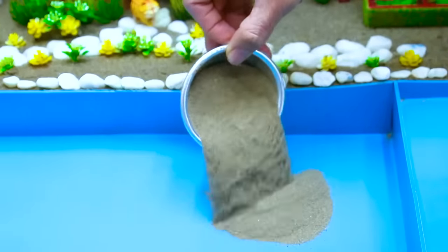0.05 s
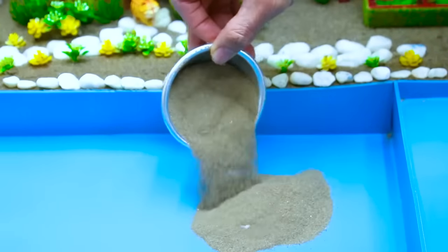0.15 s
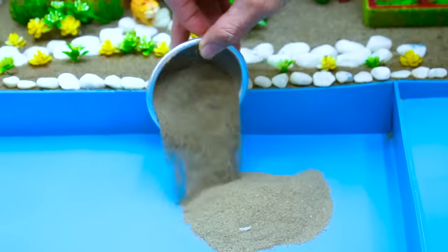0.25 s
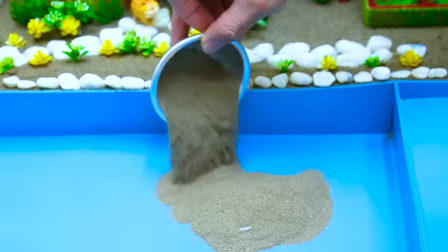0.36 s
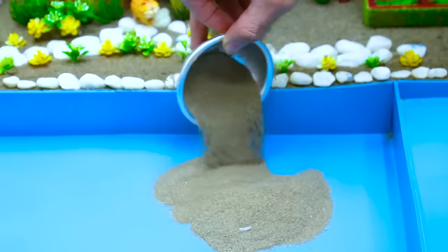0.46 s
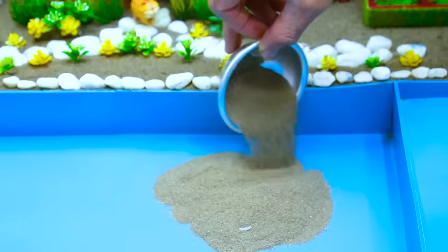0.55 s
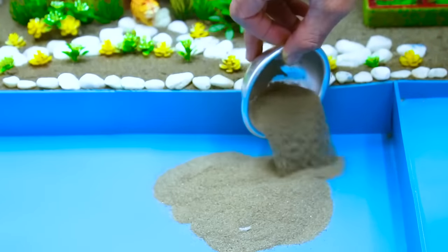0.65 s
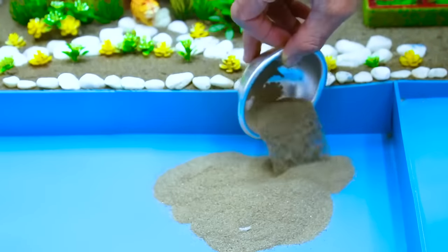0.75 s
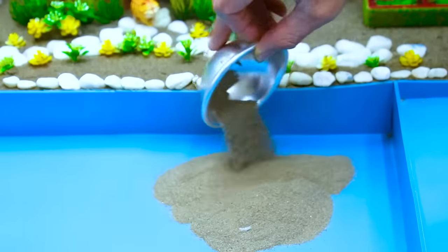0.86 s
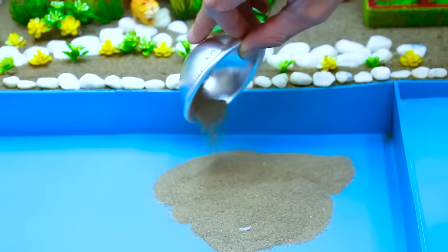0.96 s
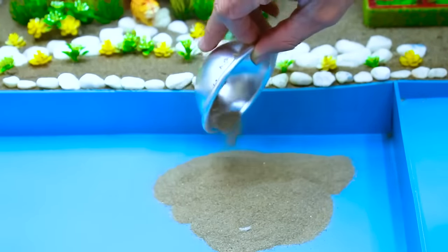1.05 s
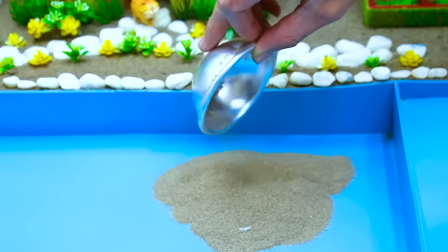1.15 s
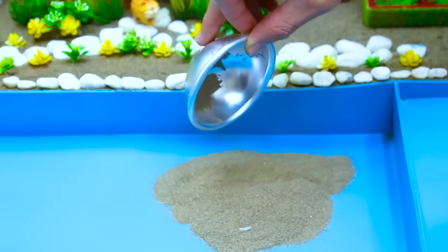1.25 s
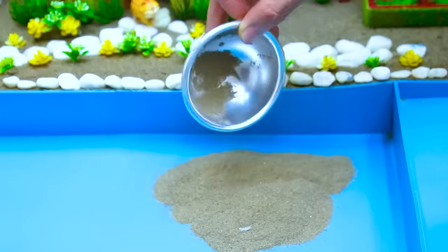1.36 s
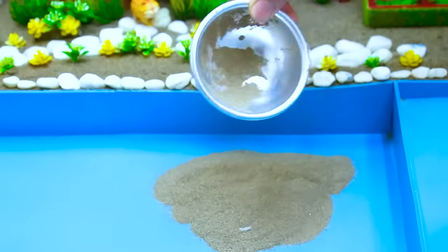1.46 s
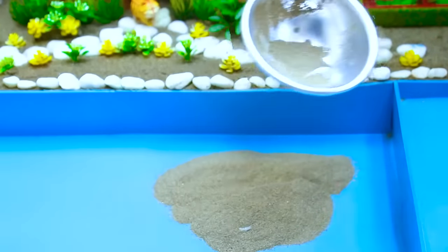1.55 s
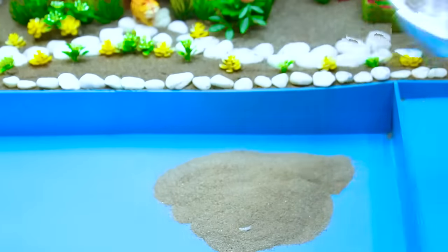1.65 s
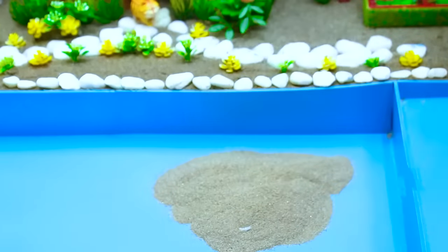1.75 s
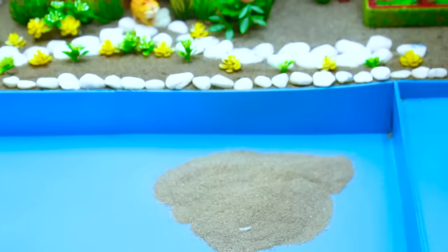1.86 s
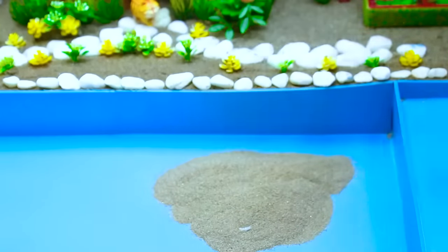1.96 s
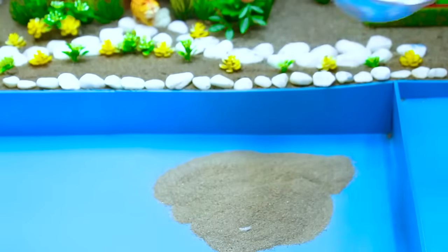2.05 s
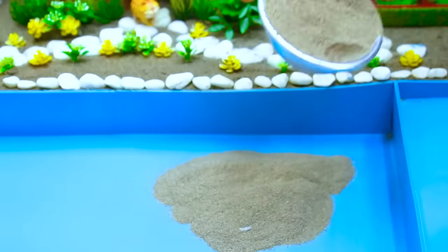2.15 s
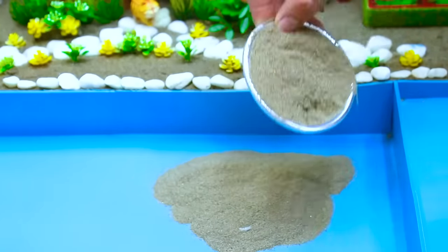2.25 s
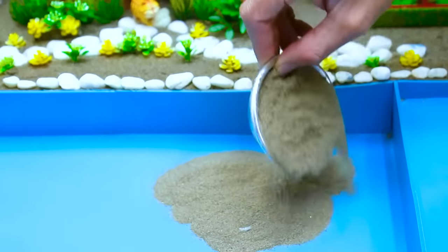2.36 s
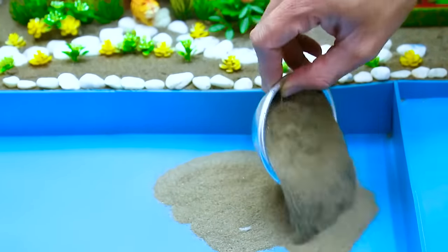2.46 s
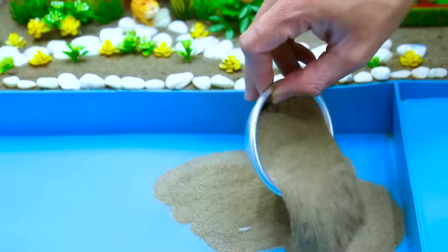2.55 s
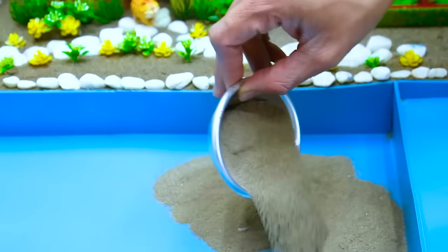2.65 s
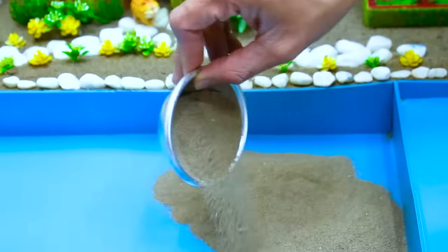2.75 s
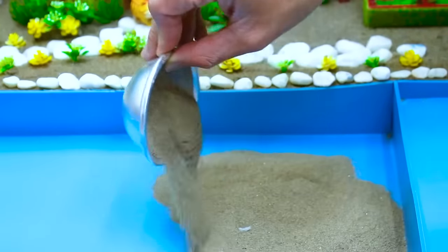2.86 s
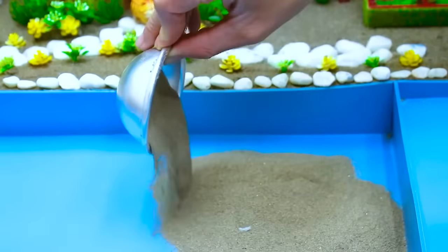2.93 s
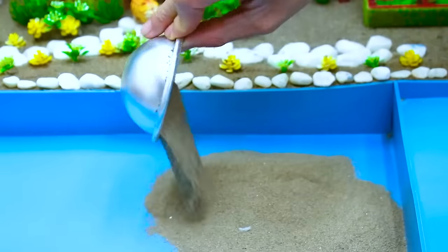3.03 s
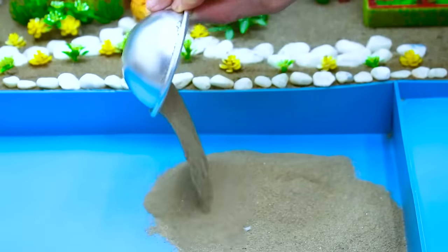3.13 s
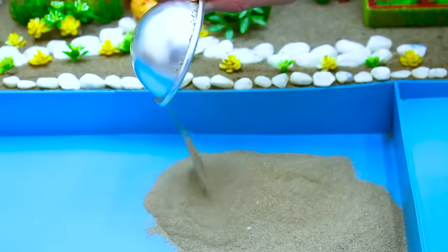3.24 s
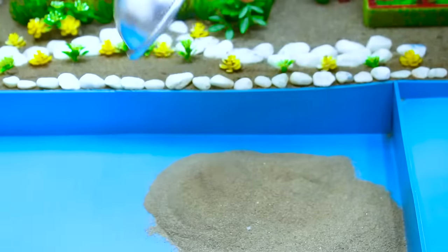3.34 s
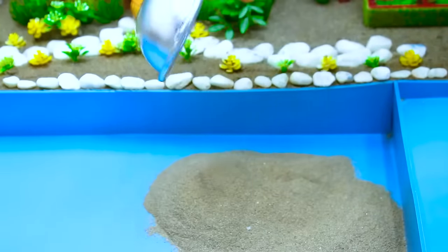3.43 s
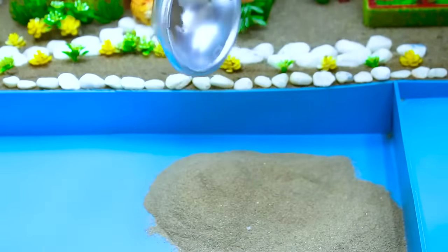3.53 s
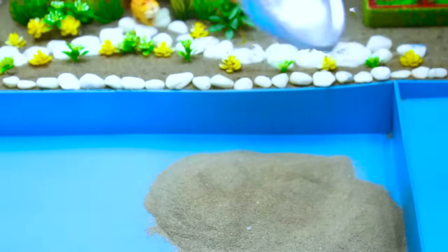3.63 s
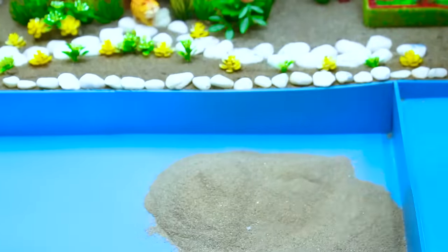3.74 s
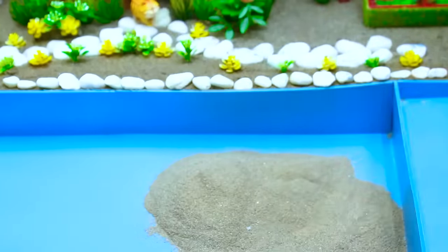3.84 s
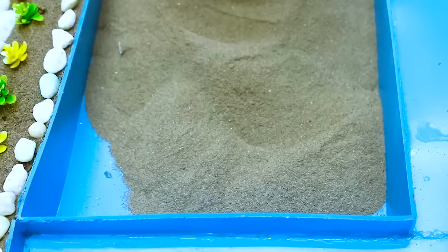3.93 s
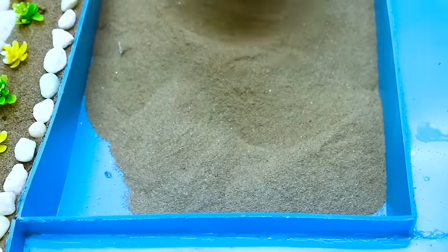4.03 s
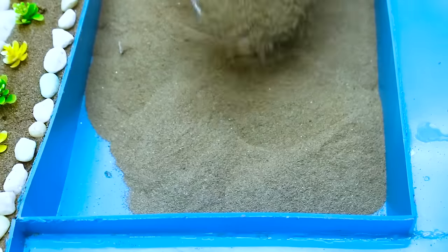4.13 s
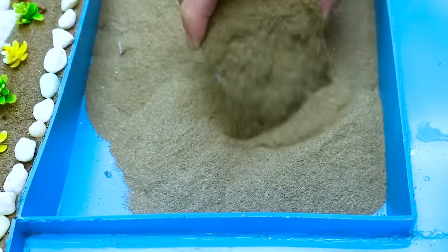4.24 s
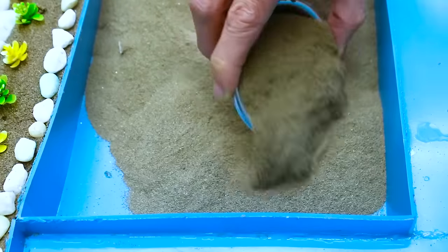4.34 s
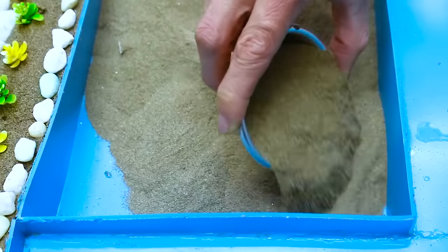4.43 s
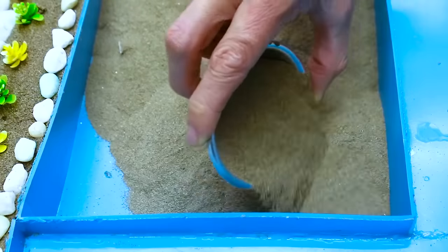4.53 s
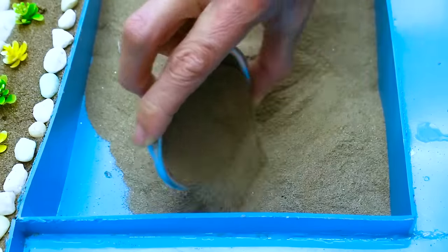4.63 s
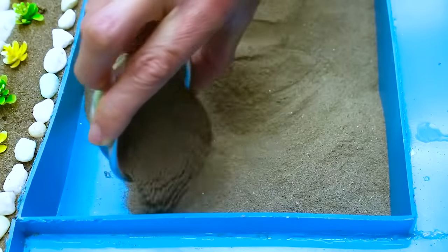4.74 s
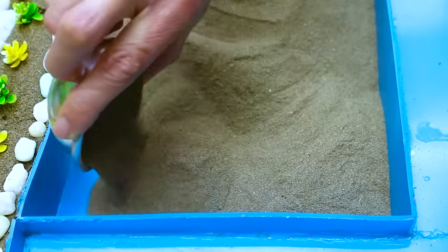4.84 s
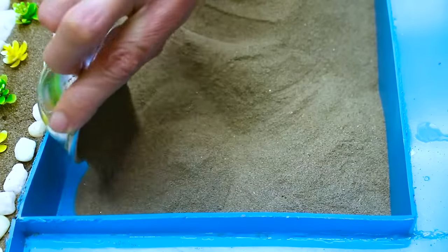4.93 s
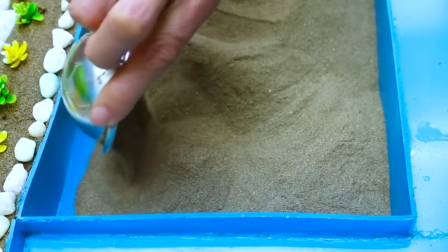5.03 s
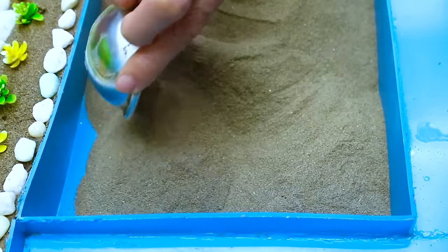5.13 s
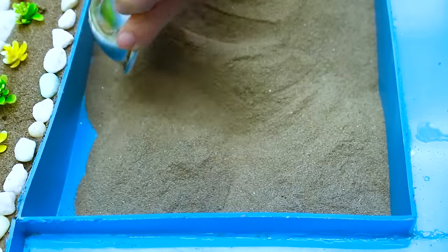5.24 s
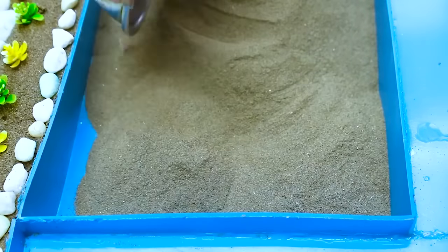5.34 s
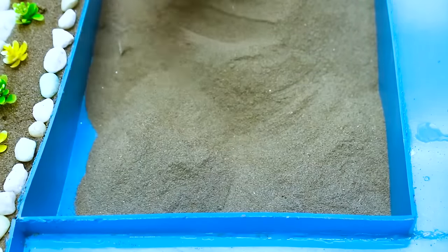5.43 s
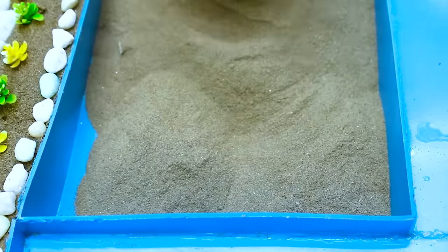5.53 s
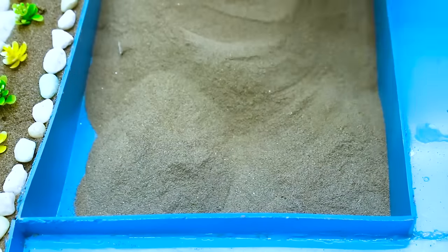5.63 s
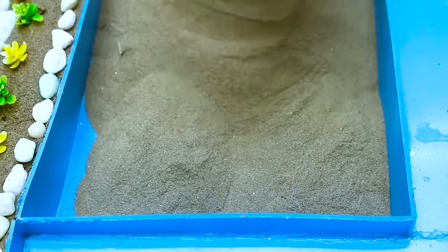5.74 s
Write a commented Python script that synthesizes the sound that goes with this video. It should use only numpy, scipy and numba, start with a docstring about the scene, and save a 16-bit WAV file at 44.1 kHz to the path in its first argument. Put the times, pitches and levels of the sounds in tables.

```python
"""A garden, the microphone close to a plastic tray, a soft rumble far off and birds among echoing trees.
The same pour of dry sand sounds three times. First coarse grains ring and fine sand patters under chirps.
Near 2.5 s grains tick and the pour comes again, brisker and higher, while a nearer bird trills twice.
That bird whistles three times, and from 4.2 s the pour ticks, rushes and trickles away once more.
Small birds and a distant flock have the last notes."""
import sys
import numpy as np
from scipy import signal
from scipy.fft import rfft, irfft, next_fast_len
from scipy.io import wavfile
from scipy.ndimage import uniform_filter1d
from numba import njit

SR = 44100
rng = np.random.default_rng(int(sys.argv[2]) if len(sys.argv) > 2 else 0)


def output_pcm(signal):
    """Save a mono or channel-first signal as 16-bit PCM at the path in sys.argv[1].

    Samples are clipped to [-1, 1] before scaling.
    """
    pcm = np.clip(np.atleast_2d(signal).T, -1, 1) * 32767
    wavfile.write(sys.argv[1], SR, np.round(pcm).astype(np.int16))


N = 255339

# Distant rumble and hiss. Each row: frequency in Hz, relative level in dB.
AIR_SPECTRUM = [(18, -50), (30, -23), (86, -33.5), (215, -5), (345, 0.5), (702, -5.5), (1390, -10),
                (1960, -9.5), (3980, -10), (12600, -21.5), (14400, -35), (16000, -72.5)]
# Echo of a high song, hanging in the trees. Each row: time in seconds, level in dB.
SONG_ECHO = [(0, -50), (.3, -47), (.55, -44.5), (.75, -54), (.95, -70)]
# The flock, far off. Each row: time in seconds, level in dB.
FLOCK_LEVEL = [(0.0, -47), (0.44, -50), (1.63, -58.5), (2.3, -104), (2.801, -100), (3.14, -62),
               (3.369, -61), (3.5, -70), (3.89, -53.5), (4.24, -63), (4.5, -65), (4.641, -45.5),
               (4.95, -67), (5.29, -54), (5.63, -42), (5.79, -76)]
# How much of the flock echoes from the sides. Each row: time in seconds, share from 0 to 1.
FLOCK_SIDE_SHARE = [(0.551, 0.08), (.75, 0.8), (1.6, 0.5), (1.8, 0)]
# Small birds, farther out. Each row: start, time to the bend and length in seconds,
# first, bend and last pitch in Hz, level at the bend in dB, rasp in Hz.
CHIRPS = [(0.118, 0.021, 0.098, 2034, 2510, 2730, -35.5, 103),
          (0.254, 0.011, 0.047, 2630, 2500, 1963, -35, 34),
          (0.299, .055, 0.071, 1987, 1896, 1820, -42.5, 30),
          (.282, 0.047, .087, 2900, 3294, 3790, -43.5, 270),
          (0.482, 0.057, 0.11, 3685, 4570, 2997, -37.5, 225),
          (0.529, 0.0075, 0.023, 4260, 4900, 5550, -42, 170),
          (0.573, .014, .075, 3710, 4070, 4060, -44.5, 54),
          (0.707, .01, 0.028, 3970, 3590, 3240, -41.5, 230),
          (0.864, .02, 0.034, 3740, 3430, 3120, -45.5, 230),
          (1.247, 0.018, 0.052, 4740, 5200, 5110, -48.5, 170),
          (1.312, .03, 0.034, 3803, 4580, 4630, -51, 120),
          (1.277, 0.047, .12, 4680, 3700, 2950, -49.5, 320), (1.42, .03, 0.087, 2184, 2100, 2035, -56, 120),
          (1.492, 0.011, 0.023, 6180, 6630, 7050, -49.5, 81),
          (1.547, .008, 0.041, 5270, 5150, 4980, -43, 16), (1.808, 0.011, 0.057, 6350, 6310, 6620, -43, 54),
          (1.848, .075, 0.087, 6810, 6730, 6790, -38, 35), (1.826, 0.03, 0.07, 3430, 3380, 3330, -52, 146),
          (1.962, 0.038, 0.066, 3870, 3950, 3890, -45.5, 11),
          (2.154, .028, 0.028, 3953, 3890, 3980, -51, 9), (2.109, .025, .05, 4400, 3300, 2430, -61, 240),
          (2.289, 0.025, 0.059, 4040, 3330, 2890, -52, 230),
          (2.413, 0.026, 0.068, 3920, 5600, 3840, -47, 190),
          (2.616, 0.051, .07, 5300, 3950, 4100, -46.5, 140),
          (3.645, 0.015, 0.042, 3710, 4900, 4700, -41.5, 100),
          (3.698, .015, .04, 4570, 4980, 4410, -43.5, 290), (3.744, 0.08, 0.13, 4520, 3954, 4000, -40, 147),
          (3.777, .01, .021, 8000, 9000, 10040, -48.5, 220),
          (3.91, .012, .03, 4900, 5700, 5800, -46.5, 220),
          (3.945, 0.0065, 0.016, 7800, 8700, 9600, -46, 210),
          (4.497, .01, 0.019, 4580, 4240, 3700, -40, 230),
          (4.746, 0.037, 0.059, 4490, 4375, 4420, -36, 100),
          (4.952, 0.023, 0.042, 6759, 6600, 6100, -36.5, 35),
          (5.144, 0.029, 0.2, 2873, 2764, 2113, -45, 53),
          (5.248, 0.0095, 0.023, 3730, 3800, 3750, -43, 120),
          (5.413, 0.065, 0.16, 4716, 3503, 3124, -33.5, 107),
          (5.579, 0.0056, 0.032, 4760, 5190, 4960, -50, 260),
          (5.694, 0.0092, 0.036, 3480, 3286, 2640, -42, 59),
          (5.765, 0.016, .035, 2394, 2950, 3100, -36.5, 26)]
# A thin falling call. Each row: start in seconds, level in dB.
SWEEPS = [(3.906, -45), (4.06, -43), (4.211, -44.5)]
# The nearer bird's whistles. Each row: start, upward flip and end in seconds,
# first, low and high pitch in Hz, early and full level in dB.
WHISTLES = [(3.213, 3.318, 3.445, 2530, 2078, 3130, -35, -26.5),
            (3.728, 3.841, 3.99, 2650, 2080, 3060, -33.5, -27),
            (4.088, 4.209, 4.325, 2710, 2250, 2892, -27.5, -29)]
# Its buzzy trills. Each row: start in seconds, length in seconds, level in dB.
TRILLS = [(2.35, 0.12, -41.5), (2.773, 0.13, -39)]
# The tray's low thrum. Each row: frequency in Hz, relative level in dB.
THRUM_SPECTRUM = [(15, -12), (30, -4), (50, 0), (80, -6), (130, -14), (220, -20), (400, -50)]
# Handling beside the tray. Each row: centre in seconds, level in dB.
THUMPS = [(.56, -63), (.7, -65), (.87, -68), (2.52, -59), (2.79, -57), (2.97, -59), (3.14, -56), (3.3, -66),
          (3.9, -68), (4.28, -60), (4.42, -64), (5.12, -63), (5.28, -67)]
# Light knocks nearby. Each row: start in seconds, level in dB, pitch in Hz, cycles to fall to 1/e.
KNOCKS = [(2.44, -45, 288, 4.0), (2.74, -44.5, 200, 3.0), (2.811, -49, 187, 6.1), (3.021, -42, 1400, 1.9),
          (3.135, -48.5, 660, 21), (3.667, -43.5, 650, 0.99), (3.864, -30.5, 1000, 0.49),
          (4.331, -57, 350, 1.2), (4.344, -36.5, 1200, 0.92)]
# Single grains on the plastic. Each row: start in seconds, level in dB.
TICKS = [(0.694, -18), (0.753, -22), (0.787, -19), (0.806, -25), (0.842, -21), (0.8534, -21), (0.8855, -20),
         (0.9439, -22), (1.004, -25), (1.027, -27), (2.4846, -24), (2.508, -11), (2.5177, -15),
         (2.533, -25), (2.566, -23), (2.5718, -12), (2.5828, -13.5), (2.6, -18), (2.608, -12.5),
         (2.6134, -20), (2.6243, -9), (2.646, -13), (2.71, -18), (2.7139, -7.5), (2.7277, -8),
         (2.9528, -11.5), (4.2658, -15.5), (4.278, -19.5), (4.343, -6), (4.3772, -15), (4.392, -20),
         (4.402, -22), (4.4253, -10.5), (4.4534, -14), (4.4619, -10), (4.471, -13), (4.4808, -10),
         (4.487, -8), (4.5032, -10.5), (4.5255, -9.5), (4.5292, -7), (4.5416, -10), (5.3185, -23.5),
         (5.3785, -31), (5.431, -26), (5.413, -26), (5.467, -24.5), (5.51, -27)]
# Lumps that slip off the rim and scatter. Each row: start in seconds, level in dB.
LUMPS = [(0.0, -24), (.021, -23), (2.483, -33.5), (2.57, -37), (2.606, -39), (2.642, -32), (2.712, -35),
         (2.728, -45), (2.8, -37), (4.376, -38), (4.452, -28), (4.482, -38.5), (4.524, -27)]
# Fine sand landing. Each row: frequency in Hz, relative level in dB.
PATTER_SPECTRUM = [(1500, -23), (2500, -14.5), (4000, -8.5), (8000, -4), (12000, 0), (15700, -2.5)]
# The course of every pour. Each row: seconds from the height of the rush at pace 1,
# rush level in dB, ring pitch in Hz, patter level in dB.
POUR_COURSE = [(-.4, -47, 6950, -52), (-.2, -42.5, 7000, -45), (-.11, -39, 7000, -43),
               (-.06, -23, 7100, -36), (-.02, -18, 7330, -29.5), (.025, -19, 7380, -28),
               (.06, -22.5, 7470, -24), (.125, -34.5, 9100, -27), (.22, -41.5, 8300, -31.5),
               (.36, -43, 7340, -35.5), (.55, -48, 6600, -42), (.85, -46, 8470, -40.5),
               (1.4, -49.5, 8400, -47)]
# The three pours. Each row: height of the rush in seconds, pace as a ratio, gain in dB,
# start, start of the fade and end in seconds, ring pitch as a ratio.
POURS = [(0.0, 1.016, 0, -.01, 1.08, 1.33, 0.99), (2.779, 1.34, -2, 2.476, 3.1, 3.45, 1.265),
         (4.624, 0.96, -0.5, 4.225, 5.3, 5.68, 0.99)]


def undb(db):
    """Gain of a level in dB."""
    return 10 ** (np.asarray(db) / 20)


def unit(x):
    """Scales x to rms 1."""
    return x / np.sqrt(np.mean(x ** 2))


def colour(x, points):
    """Shapes x by (Hz, dB) points."""
    hz, db = np.transpose(points)
    n = next_fast_len(len(x))
    f = np.arange(n // 2 + 1) * SR / n + 1
    return irfft(rfft(x, n) * undb(np.interp(np.log(f), np.log(hz), db)), n)[:len(x)]


def band(x, lo_hz, hi_hz):
    """Band-pass."""
    return signal.sosfilt(signal.butter(2, [lo_hz, hi_hz], "band", fs=SR, output="sos"), x)


def walk(rate, n=N):
    """Random levels held 1 / rate s and smoothed twice; spread near 1."""
    hold = int(SR / rate)
    steps = np.repeat(rng.standard_normal(n // hold + 1), hold)
    return 1.233 * uniform_filter1d(uniform_filter1d(steps, hold), hold)[:n]


def curves(table):
    """The samples that a table spans in time, and its other columns drawn along them."""
    s, *columns = np.transpose(table)
    i = np.arange(max(int(s[0] * SR), 0), min(int(s[-1] * SR), N))
    return i, [np.interp(i / SR, s, c) for c in columns]


@njit
def ring(n, at, hz, cycles, size):
    """Each impact is a sine that falls to 1/e in the given number of cycles."""
    out = np.zeros(n)
    for k in range(len(at)):
        pole = np.exp((2j * np.pi - 1 / cycles[k]) * hz[k] / SR)
        z = size[k] + 0j
        for i in range(at[k], min(n, at[k] + int(6 * cycles[k] * SR / hz[k]))):
            out[i] += z.imag
            z *= pole
    return out


def sing(out, note, rasp_hz, swing_hz=0., pulse=0.98, edge_s=0.0035, round_s=0.0027):
    """Adds a sine gliding through (s, Hz, dB) points; rasp shakes both pitch and level."""
    i, (hz, db) = curves(note)
    edge = np.clip(np.minimum(i - i[0], i[-1] - i) / (edge_s * SR), 0, 1)
    hz = uniform_filter1d(hz, int(round_s * SR), mode="nearest") + swing_hz + rasp_hz * walk(400, len(i))
    db = db + 0.021 * rasp_hz * walk(180, len(i))
    out[i] += np.sqrt(2) * undb(db) * edge * pulse * np.sin(2 * np.pi * np.cumsum(hz) / SR)


def garden_air(level_db=-54.5):
    """Distant rumble and faint hiss, wavering a little; a high echo fades in the first second."""
    out = unit(colour(rng.standard_normal(N), AIR_SPECTRUM)) * undb(level_db + 0.74 * walk(3.24))
    i, (db,) = curves(SONG_ECHO)
    out[i] += unit(band(rng.standard_normal(len(i)), 5700, 6000)) * undb(db)
    return out


def tree_echo(mid_and_side, t60_s=1.47, treble_t60_s=.6):
    """Trunks and leaves scatter the sound back; early echoes are strong and the treble dies first."""
    t = np.arange(int(1.4 * SR)) / SR
    noise = rng.standard_normal((2, len(t)))
    treble = band(noise, 4200, 18000)
    tail = (noise - treble) * undb(-60 * t / t60_s) + treble * undb(-60 * t / treble_t60_s)
    tail *= np.clip(t / 0.0073, 0, 1) * (1 + 3.95 * np.exp(-t / 0.019))
    tail /= np.sqrt(np.sum(tail ** 2, axis=1, keepdims=True))
    return signal.fftconvolve(mid_and_side, tail, axes=1)[:, :N]


def far_flock(calls=500):
    """Many short raspy slides blur into chatter, far from the microphone."""
    out = np.zeros(N)
    for (when, length), (pitch, slide, loud) in zip(rng.random((calls, 2)),
                                                    rng.standard_normal((calls, 3))):
        s, hz, db = 5.7 * when, 3400 * np.exp(0.15 * pitch), 2 * loud
        sing(out, [(s, hz, db), (s + .015 + .03 * length, hz * np.exp(0.18 * slide), db)], rasp_hz=200.)
    return unit(out) * undb(np.interp(np.arange(N) / SR, *np.transpose(FLOCK_LEVEL)))


def small_birds(sweep_s=.063, hook_s=0.013):
    """Middle distance: chirps swell to a bend in pitch and fade; sweeps fall to a short flat hook."""
    out = np.zeros(N)
    for s, bend, length, from_hz, bend_hz, to_hz, db, rasp_hz in CHIRPS:
        sing(out, [(s, from_hz, db - 6), (s + bend, bend_hz, db), (s + length, to_hz, db - 6)], rasp_hz)
    for s, db in SWEEPS:
        note = [(s, 7850, db - 0.5), (s + sweep_s, 5740, db), (s + sweep_s + hook_s, 5740, db - 11)]
        sing(out, note, rasp_hz=50)
    return out


def near_whistles(flip_s=.02, release_s=0.037, sag_hz_per_s=3900):
    """The nearer bird: each whistle drops, dips in level as it flips up, then swells as it sags."""
    out = np.zeros(N)
    for s, flip, end, first_hz, low_hz, high_hz, early_db, db in WHISTLES:
        down, top, crest = s + .46 * (flip - s), flip + flip_s, end - release_s
        crest_hz, end_hz = high_hz - sag_hz_per_s * (np.array([crest, end]) - top - flip_s)
        onset = [(s, first_hz, early_db - 10), (s + 0.0175, first_hz, early_db)]
        drop = [(down, 1.07 * low_hz, db), (down + flip_s, low_hz, db), (flip - flip_s, low_hz, db)]
        rise = [(flip, (low_hz + high_hz) / 2, db - 13.5), (top, high_hz, db - 7.5)]
        sag = [(top + flip_s, high_hz, db - 3.75), (crest, crest_hz, db), (end, end_hz, db - 9.5)]
        sing(out, onset + drop + rise + sag, rasp_hz=18, round_s=.015)
    return out


def near_trills(rate_hz=79):
    """The same bird buzzes: pitch and level arch up and down quickly while the note climbs."""
    out = np.zeros(N)
    for s, length, db in TRILLS:
        note = [(s, 2000, db - 11), (s + 0.0495, 2060, db), (s + length, 2250, db)]
        i, _ = curves(note)
        arch = -np.cos(2 * np.pi * rate_hz * (i - i[0]) / SR + 1.1)
        swing_hz = np.linspace(380, 617, len(i)) * arch
        sing(out, note, rasp_hz=101.5, swing_hz=swing_hz, pulse=1 + 0.45 * arch)
    return out


def thumps(width_s=0.074):
    """Soft low swells from handling near the tray."""
    t = np.arange(N) / SR
    swells = sum(undb(db) * np.exp(-((t - s) / width_s) ** 2) for s, db in THUMPS)
    return unit(colour(rng.standard_normal(N), THRUM_SPECTRUM)) * swells


def knocks():
    """Light knocks and dull bumps near the microphone, each one damped ring."""
    s, db, hz, cycles = np.array(KNOCKS).T.copy()
    return band(ring(N, (s * SR).astype(np.int64), hz, cycles, undb(db)), 140, 4000)


def tray_thrum(n, rumble_db=-68.5, hum_db=-69.5, hum_hz=48.3):
    """The tray rumbles and hums unsteadily under the load."""
    rumble = unit(colour(rng.standard_normal(n), THRUM_SPECTRUM)) * undb(rumble_db + 4.5 * walk(10, n))
    phase = 2 * np.pi * np.cumsum(hum_hz + 5.6 * walk(12.7, n)) / SR
    return rumble + np.sqrt(2) * undb(hum_db) * np.sin(phase)


def pour_course(t, pour):
    """Rush dB, ring Hz and patter dB at times t; a brisker pour runs its course sooner."""
    peak_s, pace, db, *_, pitch_ratio = pour
    s, *columns = np.transpose(POUR_COURSE)
    rush_db, ring_hz, patter_db = (np.interp((t - peak_s) * pace, s, c) for c in columns)
    return rush_db + db, ring_hz * pitch_ratio, patter_db + db


def grain_ticks(strays=40, hits=4):
    """A lone grain lands sharply, then bounces within a millisecond, softer and at other pitches."""
    listed, grains = np.array(TICKS), []
    for pour in POURS:
        start_s, fade_s, end_s = pour[3:6]
        s, db = listed[(listed[:, 0] > start_s) & (listed[:, 0] < end_s)].T
        when, softness = rng.random((strays, 2)).T
        s = np.r_[s, max(start_s, 0) + when * (fade_s - max(start_s, 0))]
        rush_db, hz, _ = pour_course(s, pour)
        stray_db = rush_db[len(db):] + 14.5 - 8 * softness  # stray grains stand out of the rush
        grains.append([s, np.r_[db, stray_db], hz])
    s, db, hz = np.repeat(np.hstack(grains), hits, axis=1)
    delay, detune, loss = rng.random((len(s), 3)).T
    bounce = np.arange(len(s)) % hits > 0
    at = ((s + 0.00086 * delay * bounce) * SR).astype(np.int64)
    hz = np.clip(hz * np.exp(.8 * (detune - .3) * bounce), 2000, 15500)
    size = undb(db - (5 + 5 * loss) * bounce)
    return band(ring(N, at, hz, np.full(len(s), 2.6), size), 3700, 15000)


def fine_patter(n):
    """Fine sand lands as a broad, spiky hiss."""
    spray = rng.standard_normal(n)
    spikes_db = 2.4 * np.minimum(rng.exponential(size=n), 6) + 1.3 * walk(40, n)
    return unit(colour(spray * undb(spikes_db), PATTER_SPECTRUM))


def coarse_rush(rush_db, ring_hz, grains=9000, cycles=4.5):
    """Coarse grains ring around a moving pitch; a heavy flow comes in clumps, a trickle is even."""
    n = len(rush_db)
    at = (rng.random(grains) * n).astype(np.int64)
    weight = np.minimum(rng.exponential(size=grains), 5)
    hz = np.clip(ring_hz[at] * np.exp(.16 * rng.standard_normal(grains) + .05), 1500, 15500)
    heavy = np.clip((rush_db[at] + 62.5) / 18, .15, 1)
    scatter_db = 2.6 * weight + 1.8 * walk(250, n)[at] - 3.2
    rush = ring(n, at, hz, np.full(grains, cycles), undb(heavy * scatter_db))
    return unit(band(rush, 2570, 16700))  # grains are too small to sound low


def sand_pours(lump_decay_s=0.0073):
    """Sand lands right at the microphone: rush, patter and thrum, with a burst for each lump."""
    out = np.zeros(N)
    for pour in POURS:
        start_s, fade_s, end_s = pour[3:6]
        i = np.arange(max(int(start_s * SR), 0), int(end_s * SR))
        t = i / SR
        rush_db, ring_hz, patter_db = pour_course(t, pour)
        lumps = sum(undb(db) * (t > s) * np.exp(-np.abs(t - s) / lump_decay_s) for s, db in LUMPS)
        rush = coarse_rush(rush_db, ring_hz) * (undb(rush_db) + lumps)
        patter = fine_patter(len(i)) * (undb(patter_db) + undb(-21) * lumps)
        onset = np.minimum((t - start_s) / 0.0054, 1)
        fade = np.minimum((end_s - t) / (end_s - fade_s), 1) ** 1.04
        out[i] += onset * fade * (rush + patter + tray_thrum(len(i)))
    return out


def scene(side_db=-12.5):
    """Mid and side: the sand is close and central; the nearer bird and the echoes give the width."""
    whistles, trills, small, flock = near_whistles(), near_trills(), small_birds(), far_flock()
    flock_aside = flock * np.interp(np.arange(N) / SR, *np.transpose(FLOCK_SIDE_SHARE))
    near_direct = whistles + undb(-1) * trills
    near_send = undb(-5.5) * whistles + undb(-3) * trills
    mid_echo, side_echo = tree_echo([near_send + undb(-2) * small + flock, near_send + flock_aside])
    birds = near_direct + undb(-1.5) * small + 0.08 * flock  # the flock arrives almost wholly as echo
    tray = sand_pours() + grain_ticks() + knocks() + thumps()
    mid = tray + birds + mid_echo + garden_air()
    side = undb(side_db) * (side_echo + 0.27 * np.roll(near_direct, 4))  # perched off to one side
    return np.array([mid + side, mid - side])


def record(dry, top_hz=15780):
    """The highest treble is cut off steeply."""
    return signal.sosfilt(signal.ellip(10, .2, 75, top_hz, fs=SR, output="sos"), dry)


dry = scene()
out = record(dry)
output_pcm(out)
```